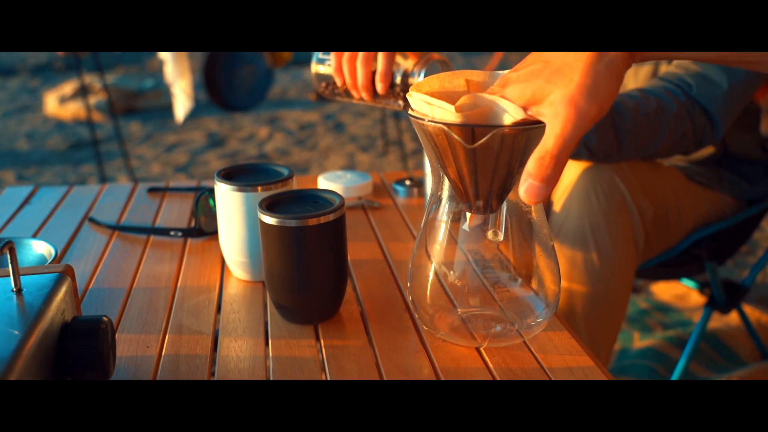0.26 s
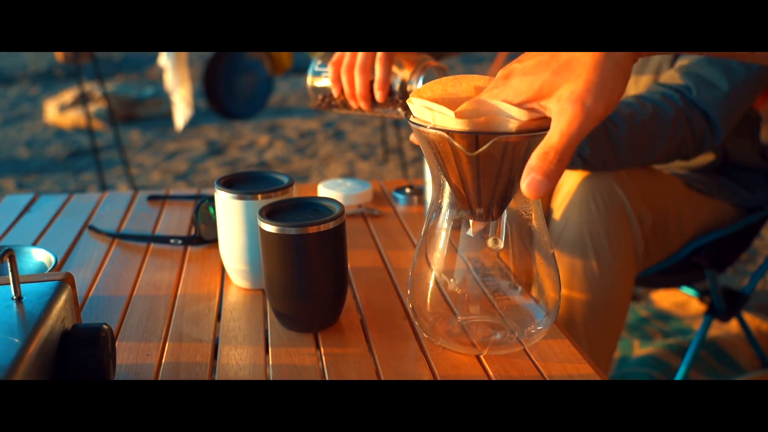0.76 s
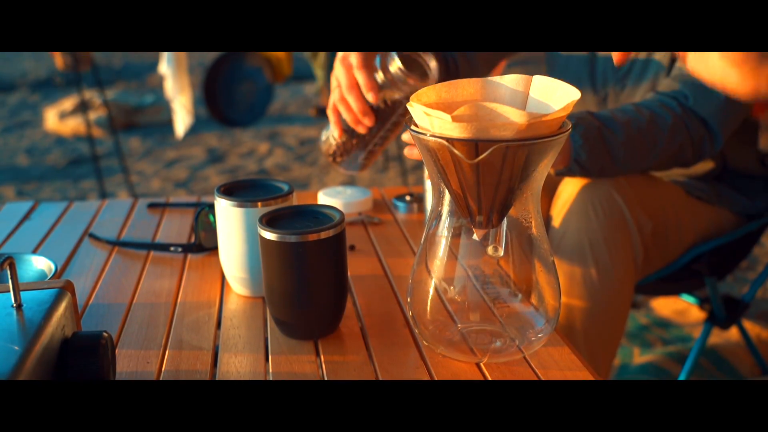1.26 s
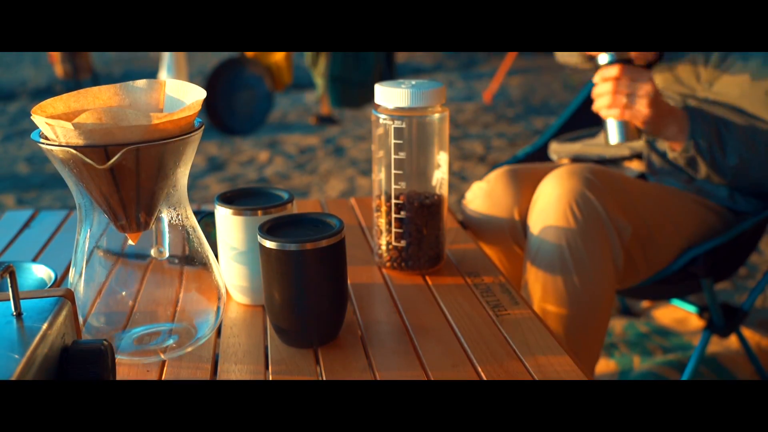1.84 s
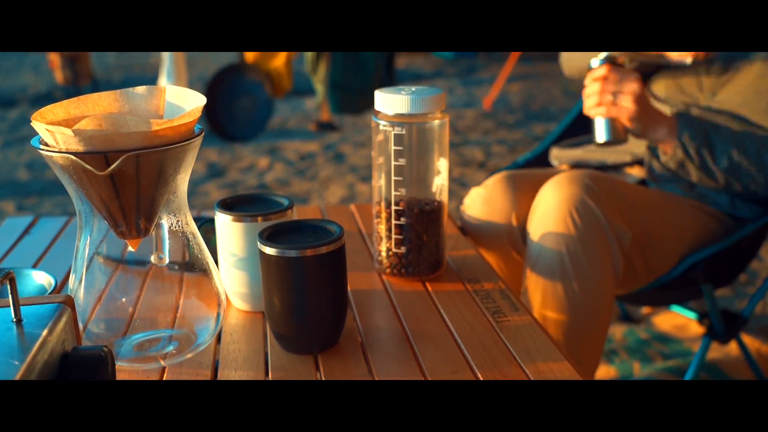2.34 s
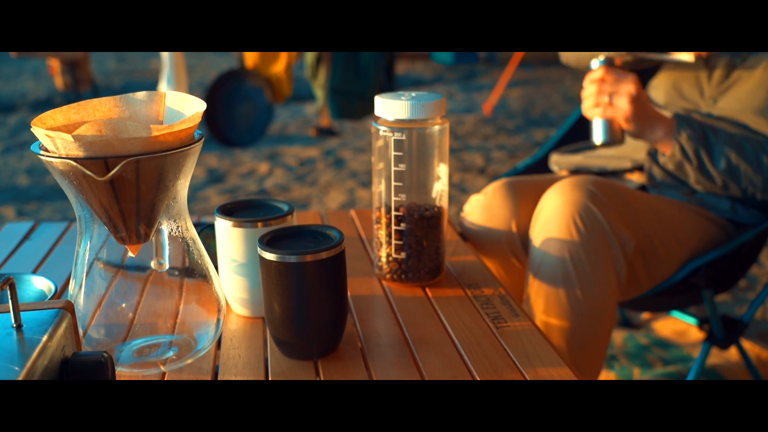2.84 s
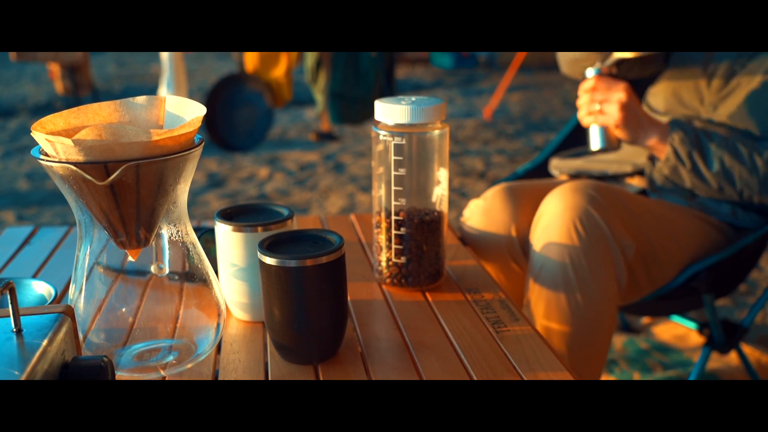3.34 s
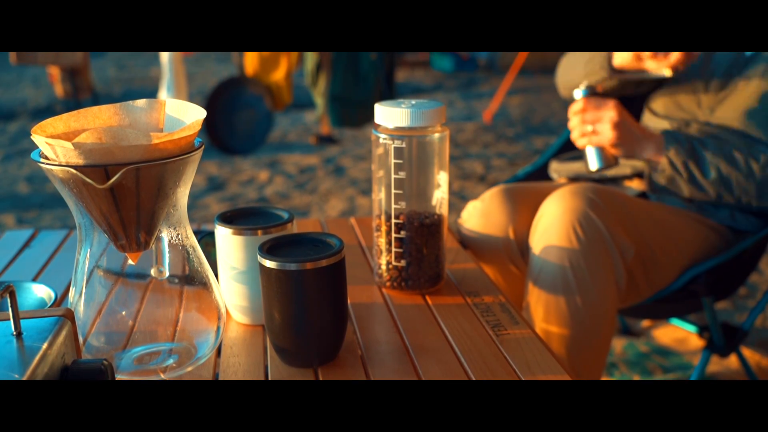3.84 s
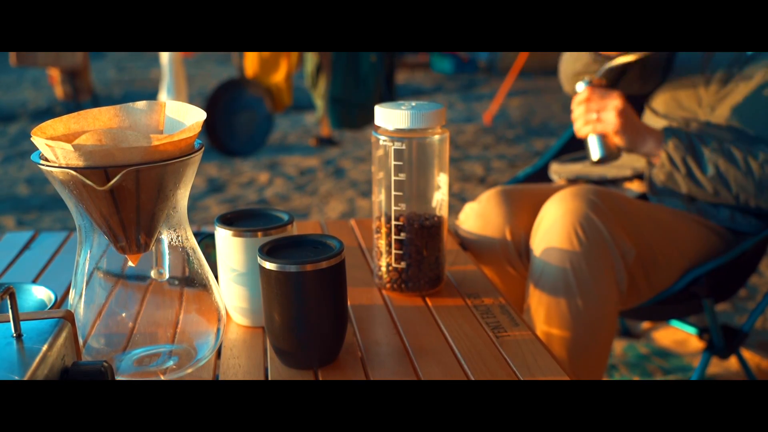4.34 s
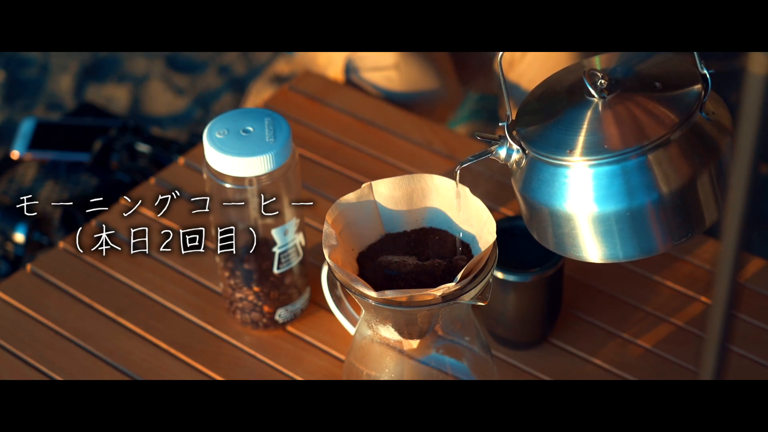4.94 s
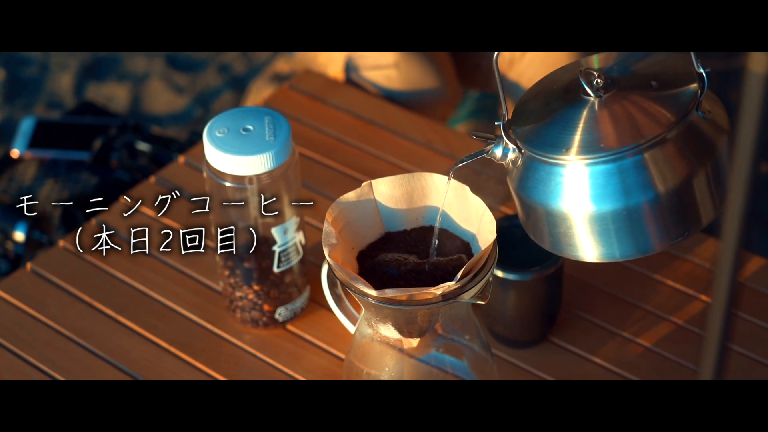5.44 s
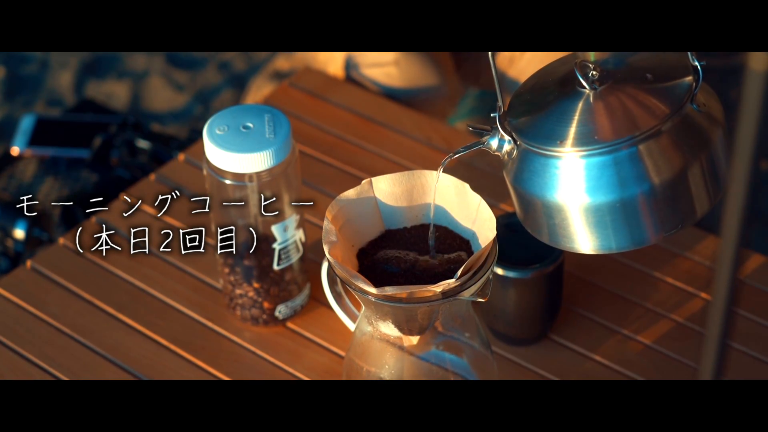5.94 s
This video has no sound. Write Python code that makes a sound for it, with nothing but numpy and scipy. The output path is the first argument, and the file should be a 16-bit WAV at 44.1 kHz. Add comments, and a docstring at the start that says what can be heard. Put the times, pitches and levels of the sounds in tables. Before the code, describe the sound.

Close, dry, mono, outdoors over low, gently swaying air. From 0 s sleeves rub and gear bumps softly. At 0.5 s a coffee bean clinks brightly in an empty steel hand grinder, another at 0.66 s, then more, closer together. From about 1.05 s beans slide in as a thickening rattle, peaking near 1.57 s, with a hollow ping; the ring dulls as the hopper fills. At 1.53 s grinding begins as the stream runs out by 1.66 s: gritty crushing and crackling in about thirteen uneven pushes with short slack dips, loud bean snaps, especially near 2.23 and 2.8 s, faint steel scrapes at 2.1 and 3.1 s, and tiny high squeaks. At 4.74 s it stops dead. Quiet air remains, with faint bumps, a soft kettle scuff at 5.04 s, then small sparse water drops ticking on grounds from 5.2 s to the end, slightly clearer after 5.65 s.

```python
"""At a camp table, coffee beans clink one by one into a steel hand grinder, then slide in as a stream.
The crank is pushed in uneven strokes: clouds of tiny pulses crush and crackle, sharp snaps split beans,
and wavering tones squeak from the shaft. Clinks are decaying steel modes; the stream is dense grains.
The grinding stops dead; noise-and-pulse drops from a kettle tick on the grounds over filtered-noise air."""
import sys
import numpy as np
from scipy import signal
from scipy.fft import rfft, irfft, next_fast_len
from scipy.io import wavfile
from scipy.ndimage import uniform_filter1d, map_coordinates

SR = 44100
rng = np.random.default_rng(int(sys.argv[2]) if len(sys.argv) > 2 else 0)


def digitize_waveform(pressure):
    """Quantize a signal to 16-bit integers and store it at the path in sys.argv[1].

    Rows of a 2-D input are taken as channels; values are limited to [-1, 1].
    """
    field = np.atleast_2d(pressure).T
    bounded = np.clip(field, -1, 1)
    quanta = np.round(bounded * 32767).astype(np.int16)
    wavfile.write(sys.argv[1], SR, quanta)


N = 272979

START_S, STOP_S = 1.527, 4.737  # the grinding
POUR_S, FULL_S = 1.04, 1.57  # the jar tips, the stream peaks
JAR_OFF_S = 1.44  # the jar is lifted from the mouth


def amp(db):
    """Decibels to gain."""
    return 10 ** (np.asarray(db) / 20)


def unit(x):
    """Scale to rms 1."""
    return x / np.sqrt(np.mean(x ** 2) + 1e-20)


def clock(size=N):
    """Seconds at each sample."""
    return np.arange(size) / SR


def gate(start, stop, rise, fall):
    """1 between two times, with linear ramps inside them."""
    return np.clip((clock() - start) / rise, 0, 1) * np.clip((stop - clock()) / fall, 0, 1)


def add(track, s, sound):
    """Mix a sound into the track at a time in seconds."""
    part = track[max(round(s * SR), 0):][:len(sound)]
    part += sound[:len(part)]


def colour(x, points):
    """Minimum-phase filter through (Hz, dB) points, so no sound precedes its cause."""
    size = 4096
    f, db = np.transpose(points)
    grid = np.log(np.fft.rfftfreq(size, 1 / SR) + 1)
    cepstrum = irfft(np.log(amp(np.interp(grid, np.log(f), db))))
    folded = np.r_[cepstrum[0], 2 * cepstrum[1:size // 2]]
    kernel = irfft(np.exp(rfft(folded, size)))
    return signal.fftconvolve(x, kernel)[:len(x)]


def resonate(x, hz, width):
    """One resonance with gain 1 at its centre; width in Hz."""
    return signal.lfilter(*signal.iirpeak(min(hz, SR / 2 - 1), hz / width, SR), x)


def noise(size=N):
    """White noise."""
    return rng.standard_normal(size)


def wobble(rate, size=N):
    """A smooth random curve, rate knots a second."""
    return map_coordinates(noise(size=2048), [clock(size) * rate], mode="wrap")


def snap(t, hz, cycles):
    """A pressure pulse that dies within a few cycles."""
    return np.sin(2 * np.pi * hz * t) * np.exp(-t * hz / cycles)


def grains(start, stop, hz, cycles, spread_db, clump_db, drift, count):
    """Many tiny impacts, mostly small and a few large; neighbours in time lean to a shared pitch."""
    when, size = rng.random((2, count))
    at = ((start + when * (stop - start)) * SR).astype(int)
    level_db = -spread_db * np.log(size + 0.033) + clump_db * wobble(70)[at]
    gain = amp(level_db) * rng.choice([-1, 1], count)
    shared_pitch = (hz * np.exp(drift * wobble(35)))[at]
    pitch = shared_pitch * np.exp(0.37 * noise(count).clip(-2, 2))
    life = cycles * np.exp(.5 * noise(count).clip(-2, 2))
    span = np.arange(320)  # samples in one grain
    shapes = gain[:, None] * snap(span / SR, pitch[:, None], life[:, None])
    return np.bincount((at[:, None] + span).ravel(), shapes.ravel(), N)[:N]


def steady(x):
    """Hold a texture near rms 1 over a tenth of a second; the floor keeps silence quiet."""
    power = np.abs(uniform_filter1d(x ** 2, SR // 10))
    return x / np.sqrt(power + np.mean(x ** 2) / 20)


def sprinkle(start, stop, count):
    """Uneven times across a span, each with two normal draws for its size and pitch."""
    chance = rng.standard_normal((count, 3))
    slots = (np.arange(count) + .5 + .5 * np.tanh(chance[:, 0])) / count
    return np.c_[start + slots * (stop - start), chance[:, 1:]]


def grinding():
    """Coarse pieces are crushed and fine grit crackles as the load on the burrs comes and goes."""
    # Tone of the crushing. Each row: frequency in Hz, gain in dB.
    crush_colour = [(120, -36), (280, -13), (400, -5.5), (540, 2), (1000, 2), (1600, 3.5), (2100, 1.5),
                    (3500, -0.5), (8000, -15.5)]
    # Tone of the grit. Each row: frequency in Hz, gain in dB.
    grit_colour = [(900, -25), (2000, -4.5), (2600, 0), (3500, -3.5), (4500, -3.5), (6000, -4), (8500, 0),
                   (11000, -11), (14000, 2), (16000, 0.5)]
    crush_db, grit_db = burr_load()
    span = START_S - .1, STOP_S + .1
    coarse = grains(*span, hz=1306, cycles=0.63, spread_db=2, clump_db=0.0, drift=0.19, count=3000)
    fine = grains(*span, hz=3290, cycles=0.94, spread_db=3.5, clump_db=0.8, drift=0.33, count=3000)
    crush = barrel(colour(coarse, crush_colour), ring_db=-1.5)
    crush = steady(patchy(crush, depth_db=2.0)) * amp(crush_db + 1.15)
    # a coarse break also throws off treble
    ticks = shed_powder(unit(fine) + 0.63 * unit(coarse), share=0.63, t60=0.078)
    grit = barrel(colour(ticks, grit_colour), ring_db=-0.5)
    grit = steady(patchy(grit, depth_db=2.5)) * amp(grit_db + 1.53)
    return (crush + grit) * gate(START_S - .05, STOP_S, rise=.1, fall=.003)


def burr_load():
    """Crush and grit levels in dB: each push bites, changes as it goes, then runs slack."""
    # Pushes on the crank, each lasting until the next. Each row: start in seconds, base crush level in dB,
    # base grit level in dB, easing over the push in dB (negative swells), change at its end in dB (positive dips).
    pushes = [(1.53, -40, -39.5, -9, 3.5), (1.712, -37, -39.5, 3.5, 4), (1.86, -39, -39.5, 4, 4),
              (2.025, -40.5, -42.5, 0, 3.5), (2.345, -40.5, -40, -3.5, 8), (2.654, -40, -38.5, 2, 14.5),
              (2.888, -41.5, -39.5, -3.5, 9), (3.117, -40.5, -42.5, 2.5, 0.5), (3.374, -40.5, -41, 6.5, 7),
              (3.606, -40.5, -41, 1, 5), (3.944, -40.5, -39.5, 9.5, 2), (4.123, -41, -42, 8, 8.5),
              (4.371, -41, -42.5, 5, -0.5)]
    slack_s, bite_s = 0.049, .014  # the burrs run free before the next push, then take hold
    starts, crush_db, grit_db, ease_db, slack_db = np.transpose(pushes)
    ends = np.r_[starts[1:], STOP_S]
    t = np.clip(clock(), starts[0], STOP_S)
    push = np.searchsorted(starts, t, side="right") - 1
    progress = (t - starts[push]) / (ends - starts)[push]
    easing = ease_db[push] * (.5 - progress)
    slack = slack_db[push] * np.exp(-((ends[push] - t) / slack_s) ** 2)
    shape_db = easing - slack + 1.2 * wobble(30)
    levels_db = np.array([crush_db[push], grit_db[push]]) + shape_db
    return uniform_filter1d(levels_db, max(int(bite_s * SR), 1))


def shed_powder(x, share, t60):
    """Each tick sheds a brief puff of powder: noise that follows the decaying tick energy."""
    pole = np.clip(amp(-60 / (t60 * SR)) ** 2, 0, 1)
    energy = signal.lfilter([1], [1, -pole], x ** 2)
    powder = colour(noise(), [(1000, 8.0), (3000, -2.0), (6000, -6.5), (15000, -23.5)])
    return unit(x) + share * unit(np.sqrt(energy) * powder)


def patchy(x, depth_db):
    """Let the colour shift at random from one moment to the next."""
    z = signal.stft(x, nperseg=1024)[2]
    field = uniform_filter1d(rng.standard_normal(z.shape), size=7, axis=0)  # across frequency
    field = uniform_filter1d(field, size=5, axis=1)  # across time
    gain = unit(amp(depth_db * unit(field)))
    return signal.istft(z * gain, nperseg=1024)[1][:N]


def barrel(x, ring_db):
    """The gripped grinder's body adds its damped resonances."""
    # Body resonances. Each row: frequency in Hz, width in Hz, gain in dB before the overall ring level.
    body_modes = [(770, 31, -11), (1090, 100, -3.5), (1618, 140, -0.5), (2575, 39, -3.5), (3510, 370, -1.5)]
    return x + amp(ring_db) * sum(amp(db) * resonate(x, hz, width) for hz, width, db in body_modes)


def bean_cracks():
    """A bean splits with one sharp pulse; its crumbs and the body ring on briefly."""
    # The loudest beans splitting in the burrs. Each row: start in seconds, pulse peak in dB before a 2 dB cut,
    # base pitch in Hz, crumbs level in dB before their fade.
    loud_cracks = [(1.6139, -15.5, 1560, -32.5), (1.7449, -17, 2420, -24.5), (1.8606, -11, 1700, -41.5),
                   (1.8851, -8.5, 1680, -28), (1.9847, -19, 1668, -38), (2.031, -19, 2400, -32.5),
                   (2.2317, -9, 1640, -30), (2.4933, -15, 3330, -29.5), (2.5573, -17.5, 1600, -28.5),
                   (2.669, -19, 1890, -27.5), (2.7667, -7, 2680, -36.5), (2.786, -8, 1830, -24),
                   (2.8072, -12.5, 2530, -26), (2.8474, -13.5, 1760, -37.5), (2.888, -22.5, 2500, -26.5),
                   (2.9115, -16, 2830, -31), (3.024, -21.5, 1600, -32), (3.332, -18.5, 2100, -33.5),
                   (3.452, -19.5, 2250, -42), (3.4623, -8.5, 2650, -31.5), (3.7003, -15.5, 1860, -35.5),
                   (3.841, -14.5, 2700, -28), (3.956, -18, 2150, -34.5), (4.021, -28, 1380, -37.5),
                   (4.1556, -17, 2570, -27.5), (4.2786, -30, 3070, -29.5), (4.3569, -21, 2870, -33),
                   (4.3821, -23, 1570, -26), (4.3884, -17.5, 900, -29), (4.4796, -17, 1980, -31.5),
                   (4.5993, -15, 2280, -35.5)]
    # typical small fragment
    chip_db, chip_hz, chip_crumbs_db = -25, 2020, -43.5
    chip_spread_db, chip_spread_octaves = 4.5, 0.9
    crumbs_t60_s = .2
    pulse_colour = [(120, -23.5), (500, -0.5), (1000, 3.0), (15000, 2.0)]
    crumbs_colour = [(200, -23.0), (600, 1.5), (1600, -2), (3500, 0.0), (8000, -13.0), (12000, -25.0)]
    out, t = np.zeros(N), clock(size=3000)
    chips = [(s, chip_db + chip_spread_db * big, chip_hz * 2 ** (chip_spread_octaves * high), chip_crumbs_db)
             for s, big, high in sprinkle(START_S, STOP_S - .1, count=26)]
    for s, peak_db, hz, crumbs_db in list(loud_cracks) + chips:
        pulse = snap(t, hz * 0.97, cycles=0.56) + 0.5 * snap(t, hz * 1.67, cycles=1.0)
        pulse = barrel(colour(pulse, pulse_colour), ring_db=3.5)
        crumbs = unit(barrel(colour(noise(len(t)), crumbs_colour), ring_db=4))
        fade = amp(3.5 - 60 * t / 0.015) + amp(-12.5 - 60 * t / crumbs_t60_s)
        split = amp(peak_db - 2.0) * pulse / np.abs(pulse).max()
        add(out, s, split + amp(crumbs_db) * crumbs * fade)
    return out


def burr_scrapes():
    """The burrs brush each other: steel on steel in a rough, narrow ring."""
    # Each row: start in seconds, length in seconds, pitch in Hz, level in dB.
    scrapes = [(2.13, 0.26, 2730, -47), (3.113, .19, 2750, -45.5)]
    width_hz = 340
    out = np.zeros(N)
    for s, length, hz, db in scrapes:
        rough = noise() * amp(3 * wobble(90))
        ring = resonate(resonate(rough, hz, width_hz), hz, width_hz)
        out += unit(ring) * amp(db) * gate(s, s + length, rise=0.038, fall=length / 2)
    return out


def squeaks():
    """The dry shaft sings for a moment now and then, pure or rasping as it sticks and slips."""
    # Pure squeaks. Each row: centre in seconds, length in seconds, mean pitch in Hz,
    # level in dB before the swell, quiver in Hz.
    pure_squeaks = [(1.962, .025, 14820, -45, 40), (2.196, 0.0063, 6720, -22.5, 110),
                    (2.201, 0.04, 6760, -42.5, 60), (2.37, 0.054, 14900, -45, 45),
                    (3.313, .054, 14830, -53, 25), (4.295, 0.07, 14900, -54, 40)]
    # Rasping catches. Each row: centre in seconds, length in seconds, level in dB before the swell.
    rasping_catches = [(2.537, 0.022, -38.5), (2.978, 0.032, -44), (3.445, 0.019, -41), (3.475, 0.018, -43),
                       (4.04, .013, -49), (4.378, 0.0057, -30)]
    # Balance of a catch's harmonics, from the fundamental up: one level in dB each.
    catch_harmonics_db = [-7, 4, 1, 6]
    catch_hz, catch_quiver_hz = 3490, 35.7
    out, t = np.zeros(N), clock(size=SR // 5)
    for s, length, hz, db, quiver_hz in pure_squeaks:
        add(out, s - t.mean(), amp(db) * squeal(t, length, hz, quiver_hz, [0]))
    for s, length, db in rasping_catches:
        add(out, s - t.mean(), amp(db) * squeal(t, length, catch_hz, catch_quiver_hz, catch_harmonics_db))
    return out


def squeal(t, length, hz, quiver_hz, harmonics_db):
    """A brief, unsteady stick-slip tone that swells around the middle of t."""
    phase = 2 * np.pi * np.cumsum(hz + quiver_hz * wobble(692, len(t))) / SR
    tone = unit(sum(amp(level) * np.sin((k + 1) * phase) for k, level in enumerate(harmonics_db)))
    swell = np.exp(-2 * ((t - t.mean()) / length) ** 2)
    return tone * swell * amp(5.2 * wobble(253.3, len(t)))


def bean_clinks():
    """Each bean strikes another spot of the hopper and favours two pitches among its modes."""
    # The loudest beans hitting the hopper. Each row: start in seconds, strike peak in dB,
    # most favoured frequency in Hz, second favoured frequency in Hz.
    loud_beans = [(.499, -12.5, 3760, 1970), (.659, -11.5, 3760, 2025), (.797, -16, 3120, 1380),
                  (.865, -17.5, 3760, 5170), (.948, -23, 3060, 2490), (1.006, -20, 1380, 2490),
                  (1.065, -25.5, 3080, 1400), (1.142, -22, 3100, 4500), (1.17, -20.5, 4470, 3080),
                  (1.259, -18, 3080, 2030), (1.271, -24, 2490, 3080), (1.307, -21, 7700, 7200),
                  (1.374, -20.5, 1380, 4430), (1.445, -22, 4430, 3760), (1.473, -17.5, 4460, 5030)]
    # Modes of the empty steel hopper. Each row: frequency in Hz, base level in dB,
    # decay by 60 dB in seconds; strike scatter and the heap of beans shift these.
    steel_modes = [(713, -17.5, 0.081), (1384, -3, 0.04), (2010, -6.5, 0.044), (2536, -2, 0.031),
                   (3100, -6.5, 0.041), (3697, -1.5, 0.021), (4596, -0.5, 0.031), (5110, -7, 0.016),
                   (6050, -5, 0.023), (7220, -18, 0.036), (7810, -4, 0.01), (7930, -1, 0.015),
                   (13860, -2, 0.022)]
    # smaller beans of the stream
    clink_db, clink_spread_db, clink_hz, clink_spread_octaves = -30, 2.5, 3280, 0.86
    heap_flattens = 0.058  # share by which the full heap lowers the ring
    ping_t60_s = .065  # the enclosed air dies away quickly
    tick_colour = [(300, -14), (1500, 4.0), (4000, 6), (9000, 2), (11500, -9.0), (14000, -15.5)]
    out, t = np.zeros(N), clock(size=6000)
    hz, db, t60 = np.transpose(steel_modes)[:, :, None]
    small = [(s, clink_db + clink_spread_db * big, clink_hz * 2 ** (clink_spread_octaves * high), clink_hz)
             for s, big, high in sprinkle(POUR_S, FULL_S, count=11)]
    for s, peak_db, first_hz, second_hz in list(loud_beans) + small:
        near = lambda ring_hz: np.exp(-(np.log(hz / ring_hz) / 0.089) ** 2)
        heap = np.interp(s, [.85, 1.25], [0, 1])  # the growing heap damps and dulls the steel
        life = t60 * (1 - 0.5 * heap)
        chance = rng.standard_normal((2, len(hz), 1))
        favour_db = 8 * near(first_hz) + 6 * near(second_hz)
        strike_db = db + favour_db - 8 * heap * (hz / hz.max()) ** 2 + 2 * chance[0]
        mode_hz = hz * (1 - heap_flattens * heap + 0.012 * chance[1])
        tones = np.sin(2 * np.pi * mode_hz * t + 2 * np.pi * rng.random(hz.shape))
        ring = (amp(strike_db - 60 * t / life) * tones).sum(0)
        tick = noise(len(t)) * (amp(4.5 - 60 * t / 0.0078) + amp(-10.5 - 60 * t / 0.11))
        hit = ring + colour(tick, tick_colour)
        # with the jar tipped against the mouth, the enclosed air pings too
        ping_hz = 1160 * (1 + 0.037 * rng.normal())
        ping = np.sin(2 * np.pi * ping_hz * t) * amp(-9 - 60 * t / ping_t60_s)
        enclosed = POUR_S < s < JAR_OFF_S
        add(out, s, amp(peak_db) * (hit / np.abs(hit).max() + enclosed * ping))
    return out


def bean_stream():
    """Beans slide in as dense grains; their rattle deepens, and knocks sound the hollow of the hopper."""
    # Tone of the hopper under the rattle. Each row: frequency in Hz, gain in dB.
    rattle_colour = [(200, -36), (400, 3), (650, -6), (1100, 3), (2000, -2.5), (3500, -4.5), (5000, 2),
                     (8500, -7), (11000, -11), (15000, -28)]
    thick_s, pour_end_s = 1.14, 1.66  # the stream thickens, has run out
    rattle_db, rattle_db_per_s = -36.5, 29.5  # level at the peak, and how fast it grows and falls
    empty_hz, full_hz, fill_power = 7070, 4450, 1.1  # the pitch falls as the hopper fills
    hollow_db, hollow_rise_s, hollow_fall_s = -46.5, 0.11, 0.066  # the hopper's air
    fill = np.clip((clock() - POUR_S) / (FULL_S - POUR_S), 0, 1.2)
    hz = empty_hz * (full_hz / empty_hz) ** (fill ** fill_power)
    hits = grains(POUR_S, pour_end_s, hz=hz, cycles=0.72, spread_db=7.5, clump_db=0.5, drift=0.14, count=1300)
    hollow = steady(resonate(resonate(hits, 1176, 220), 910, 530)) * amp(hollow_db)
    hollow = hollow * gate(POUR_S, JAR_OFF_S, rise=hollow_rise_s, fall=hollow_fall_s)
    swell_db = rattle_db - rattle_db_per_s * np.abs(FULL_S - clock())
    rattle = steady(colour(hits, rattle_colour)) * amp(swell_db)
    return hollow + rattle * gate(thick_s, pour_end_s, rise=.03, fall=pour_end_s - FULL_S)


def kettle_drips():
    """Drops tick on the wet grounds: a short pulse and a splash of noise."""
    # The loudest drops. Each row: time in seconds (the tick starts 2.4 ms later), peak in dB before a 2 dB cut.
    loud_drips = [(5.6578, -38), (5.7236, -35.5), (5.8506, -41), (6.0142, -43), (6.0544, -41),
                  (6.1453, -41.5)]
    # Tone of a splash on wet grounds. Each row: frequency in Hz, gain in dB.
    splash_colour = [(200, -15), (1000, 6), (1700, 7), (4000, -2.5), (8000, -7.5), (15000, -14)]
    drip_hz = 1080
    trickle_s, trickle_db, trickle_spread_db = 5.18, -43.5, 2  # small drops: start, typical level, spread
    out, t = np.zeros(N), clock(size=1500)
    trickle = [(s, trickle_db + trickle_spread_db * big) for s, big, _ in sprinkle(trickle_s, N / SR, count=10)]
    for s, db in list(loud_drips) + trickle:
        fade = amp(-3.0 - 60 * t / 0.0056) + amp(-24 - 60 * t / 0.03)
        splash = colour(noise(len(t)), splash_colour) * fade
        drop = snap(t, drip_hz, cycles=0.95) * 0.5 + splash
        add(out, s + 0.0024, amp(db - 2.0) * drop / np.abs(drop).max())
    return out


def handling():
    """Sleeves rub as flickering noise, the gear is bumped softly, and the kettle scuffs once."""
    # Tone of the cloth. Each row: frequency in Hz, gain in dB.
    cloth_colour = [(88, -59), (150, -6.5), (515, -7), (578, -34), (687, -10.5), (1030, -4.5), (1490, -7.5),
                    (5840, -13.5), (15000, -34.5)]
    # Soft bumps of the gear in the hands and on the table. Each row: start in seconds,
    # level in dB before a 2 dB lift and the fade, mean ring pitch in Hz, decay by 60 dB in seconds,
    # scuff in dB against the ring.
    soft_bumps = [(.002, -36.5, 1260, .11, -5.5), (.053, -40, 690, 0.074, 5.5), (.206, -52, 299, 0.4, 2),
                  (.283, -41.5, 527, 0.28, 0.5), (.361, -37.5, 1400, .037, -0.5),
                  (.478, -40, 994, 0.042, 1.5), (.594, -48, 619, 0.081, 6), (.776, -41.5, 515, 0.18, -2),
                  (1.263, -38, 526, 0.117, -3), (2.53, -48, 338, .19, 1), (3.615, -36, 519, 0.1, -1),
                  (4.035, -38.5, 603, 0.23, -12.5), (4.174, -45, 165, 0.22, 5),
                  (4.818, -57.5, 186, 0.44, -3), (4.886, -48, 143.6, 0.36, -6),
                  (5.335, -46.5, 142, 0.17, -3), (6.07, -52.5, 121, .47, -14)]
    rub_db, first_rub_db, rub_settle_s = -53, 12, 0.12  # level, extra at first, settling time
    rustle_db, rustle_hz = -67, 7220  # fine ticks of the sleeves
    scuff_colour = [(60, -17), (400, 9), (1500, 0), (5000, -20), (12000, -30)]
    kettle_colour = [(300, -3), (1500, -1.5), (3000, -4.5), (6500, -3.5), (10000, -12), (15000, -19)]
    rub = steady(colour(noise() * amp(2.55 * wobble(150)), cloth_colour))
    rub_level_db = rub_db + first_rub_db * np.exp(-clock() / rub_settle_s)
    out = rub * amp(rub_level_db) * gate(-1, 1.92, rise=.1, fall=1.0)
    rustle = grains(0, POUR_S, hz=rustle_hz, cycles=0.86, spread_db=3, clump_db=3.5, drift=0.45, count=120)
    out += unit(rustle) * amp(rustle_db)
    t = clock(size=SR // 4)
    for s, db, hz, t60, scuff_db in soft_bumps:
        ring = np.sqrt(2) * np.sin(2 * np.pi * hz * t + 1.07 * wobble(121, len(t)))
        scuff = unit(colour(noise(len(t)), scuff_colour))
        soft_onset = 1 - np.exp(-t / 0.0019)
        add(out, s, (ring + amp(scuff_db) * scuff) * amp(db + 2 - 60 * t / t60) * soft_onset)
    kettle_scuff = unit(colour(noise(len(t)), kettle_colour))
    add(out, 5.044, kettle_scuff * amp(-47.0 - 60 * t / 0.15))
    return out


def outdoors():
    """Open air as low noise, two faint high whistles, and a deeper rumble that ends with the grinding."""
    # Tone of the open air. Each row: frequency in Hz, gain in dB.
    air_colour = [(13, -42), (22, 2.5), (70, 2), (163, -8), (203, -5.5), (282, -13.5), (608, -12.5),
                  (737, -17), (1310, -23), (2090, -30.5), (6810, -35.5), (8250, -34.5), (15500, -43)]
    # Faint thin whistles. Each row: start in seconds, length in seconds, pitch in Hz, level in dB.
    whistles = [(5.48, 0.1, 4500, -74), (5.684, .26, 7800, -64)]
    air_sway_db = 1.3  # the open air swells and sinks a little
    rumble_colour = [(15, -10.0), (40, 1.0), (80, -8), (160, -15.0), (500, -24.0), (3000, -72)]
    air = unit(colour(noise(), air_colour)) * amp(-56.5 + air_sway_db * wobble(6))
    rumble = unit(colour(noise(), rumble_colour))
    for s, length, hz, db in whistles:
        whistle = unit(resonate(resonate(noise(), hz, .11 * hz), hz, .11 * hz))
        air = air + whistle * amp(db) * gate(s, s + length, rise=0.035, fall=length / 2)
    return air + rumble * amp(-62.5) * gate(-1, STOP_S, rise=.1, fall=.01)


def scene():
    """All sources, close and dry in the open air, in one channel."""
    grinder = grinding() + bean_cracks() + burr_scrapes() + squeaks() + bean_clinks() + bean_stream()
    return (grinder + kettle_drips() + handling() + outdoors())[None]


def record(dry):
    """The recorder keeps nothing above its band limit."""
    top_hz = 16000
    size = next_fast_len(N + SR // 2)
    passed = np.fft.rfftfreq(size, 1 / SR) < top_hz
    return irfft(rfft(dry, size) * passed, size)[..., :N]


dry = scene()
out = record(dry)
digitize_waveform(out)
```